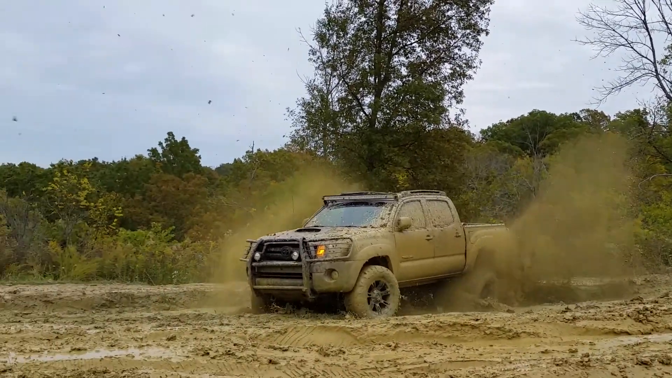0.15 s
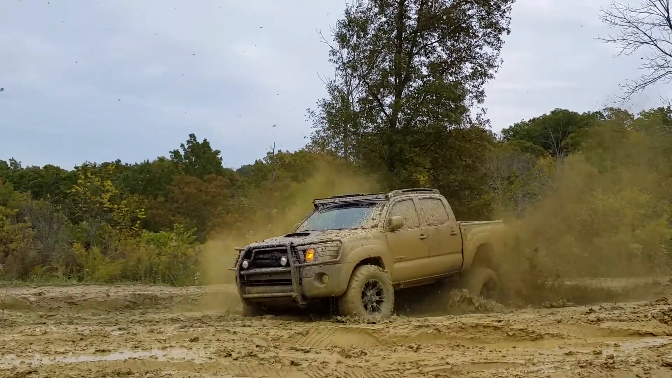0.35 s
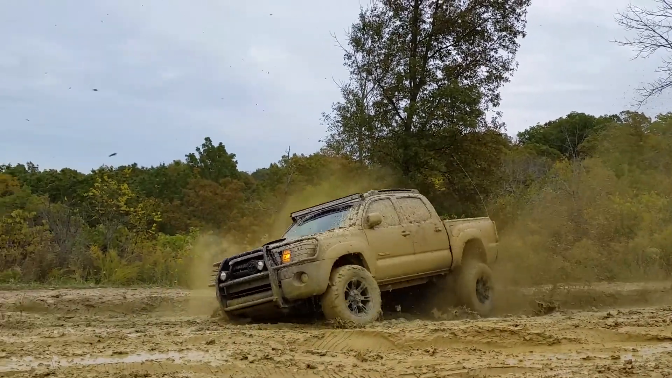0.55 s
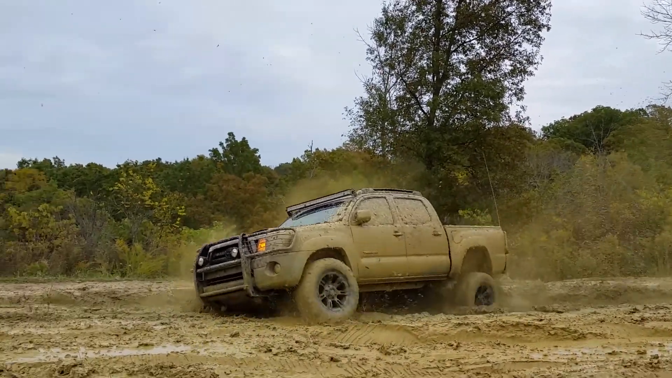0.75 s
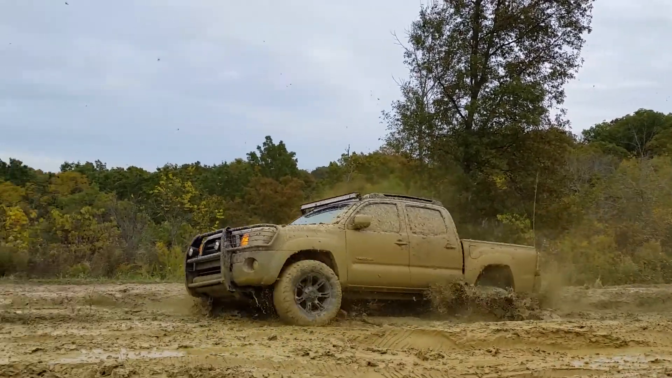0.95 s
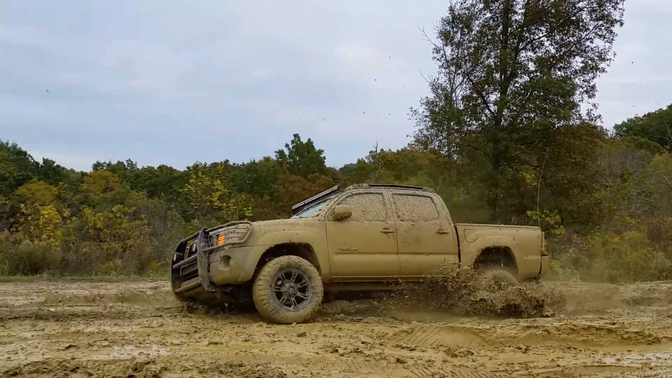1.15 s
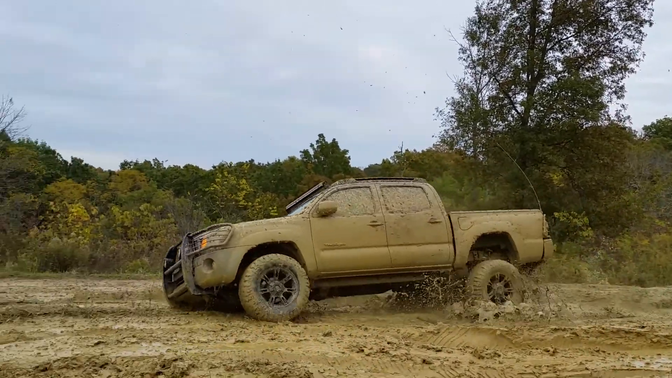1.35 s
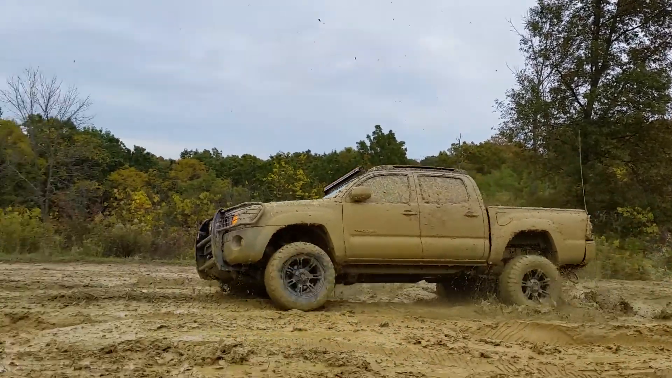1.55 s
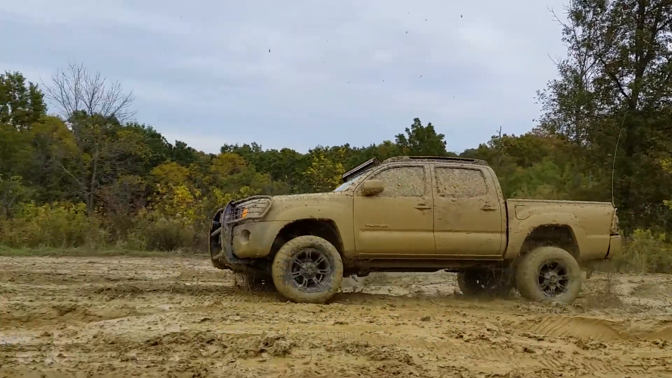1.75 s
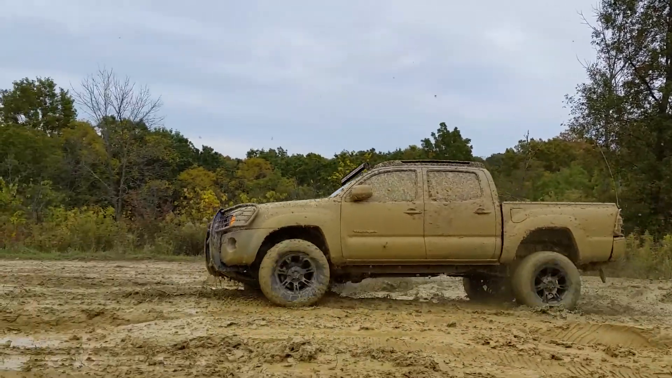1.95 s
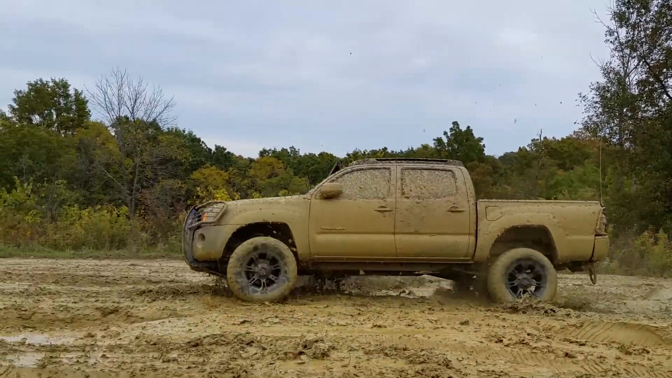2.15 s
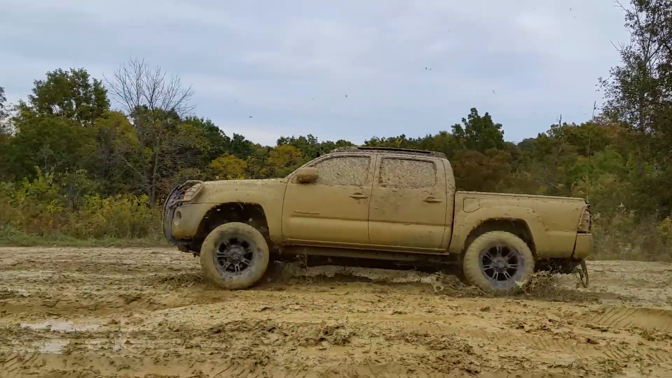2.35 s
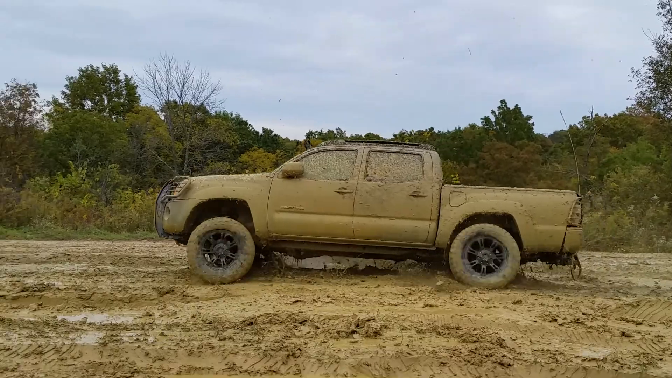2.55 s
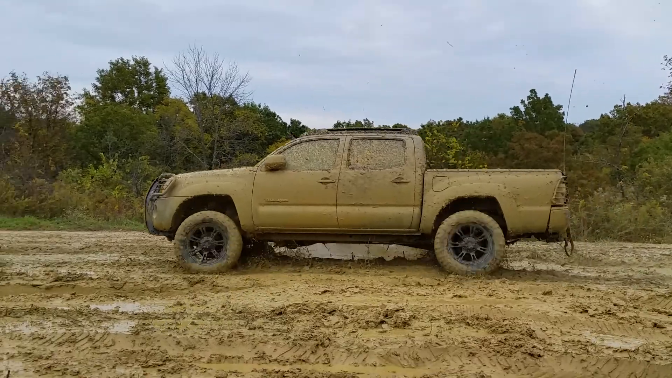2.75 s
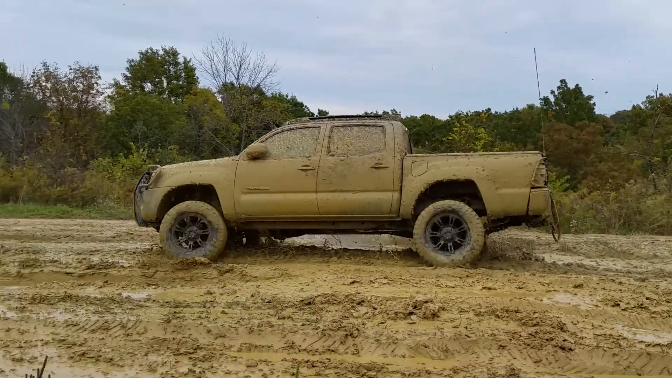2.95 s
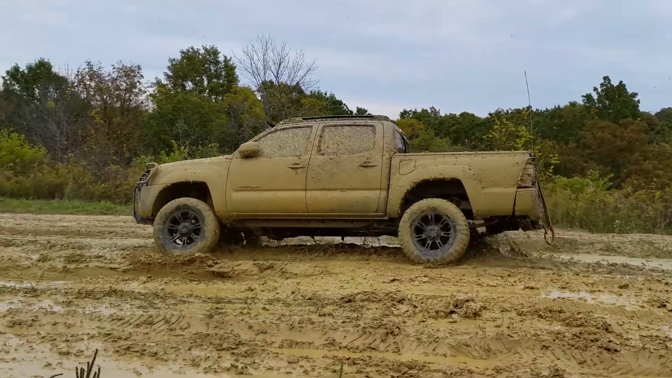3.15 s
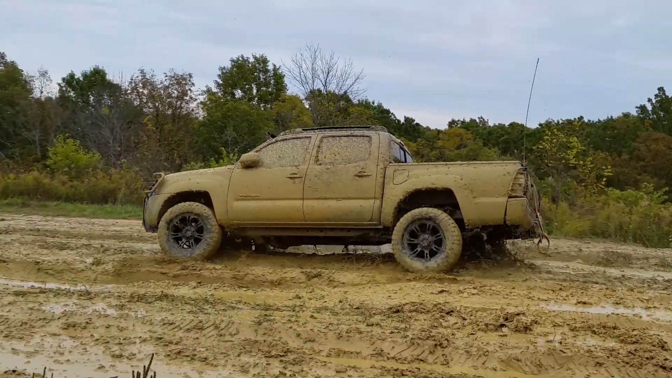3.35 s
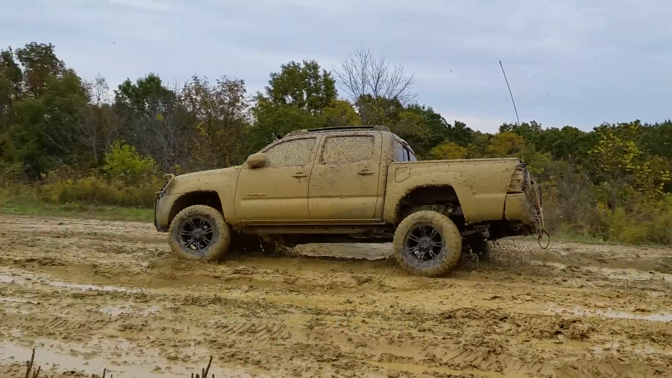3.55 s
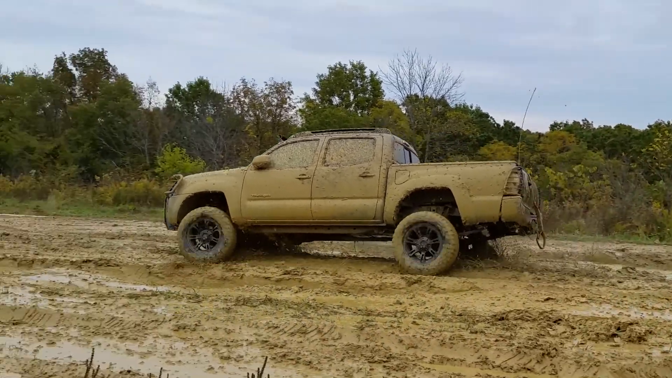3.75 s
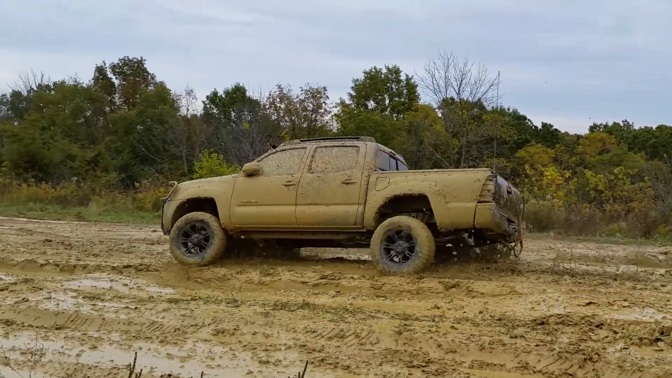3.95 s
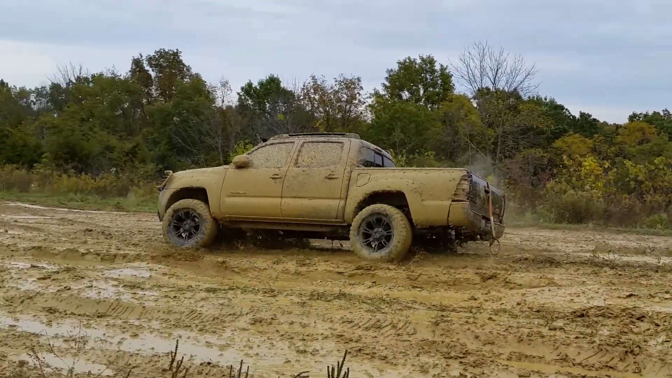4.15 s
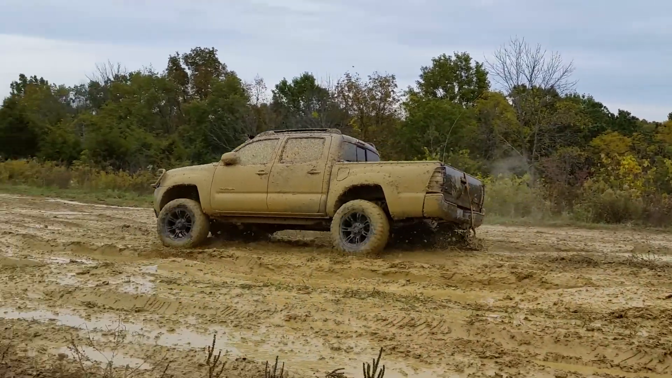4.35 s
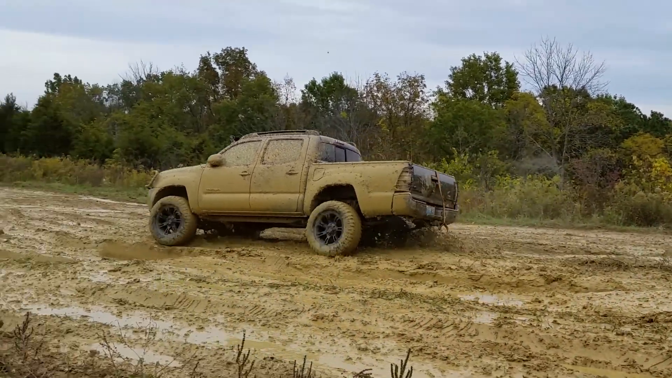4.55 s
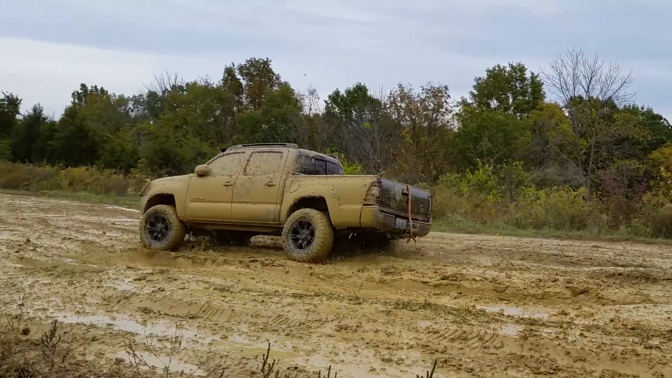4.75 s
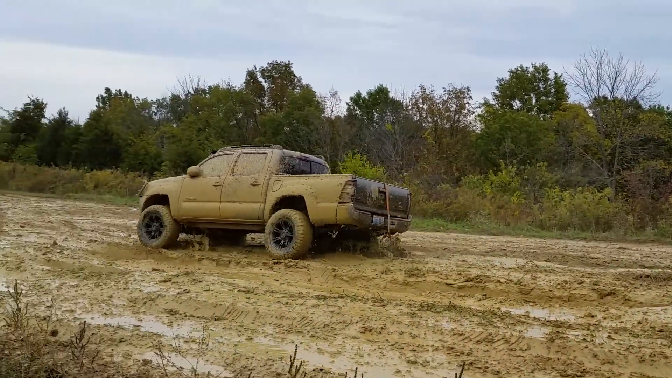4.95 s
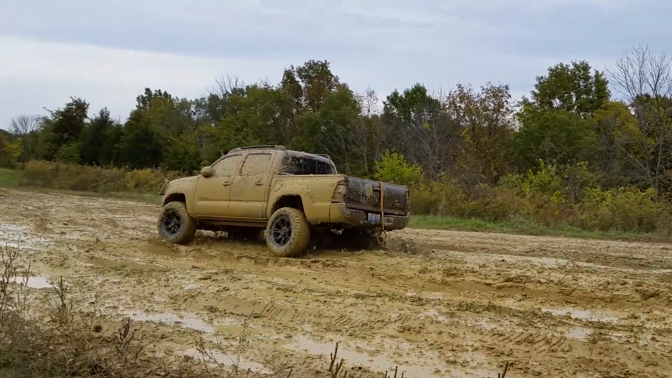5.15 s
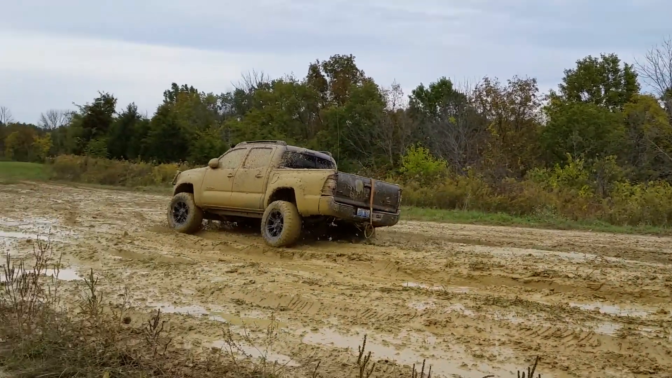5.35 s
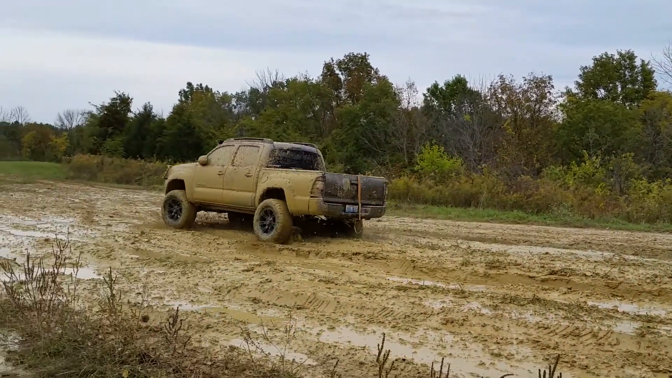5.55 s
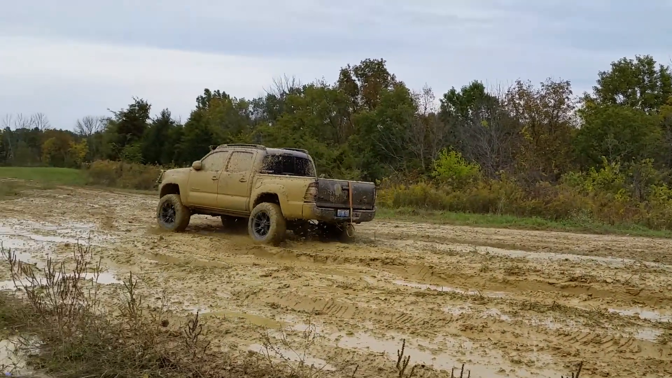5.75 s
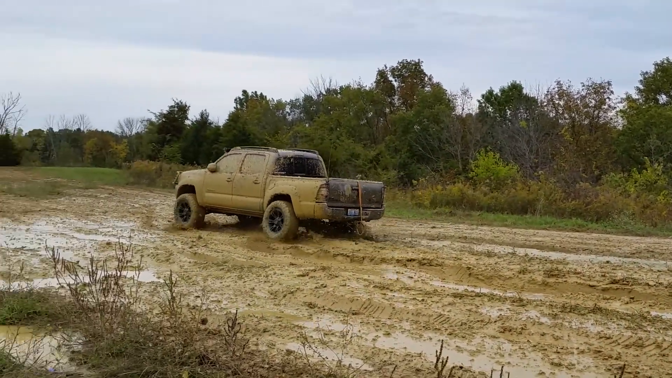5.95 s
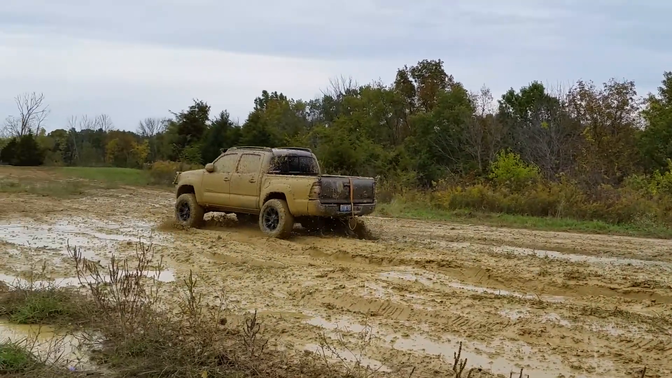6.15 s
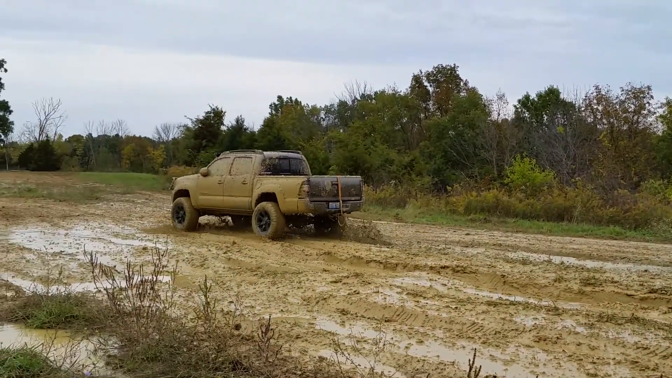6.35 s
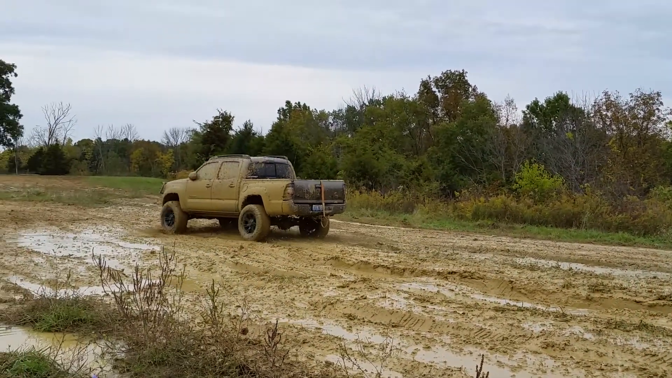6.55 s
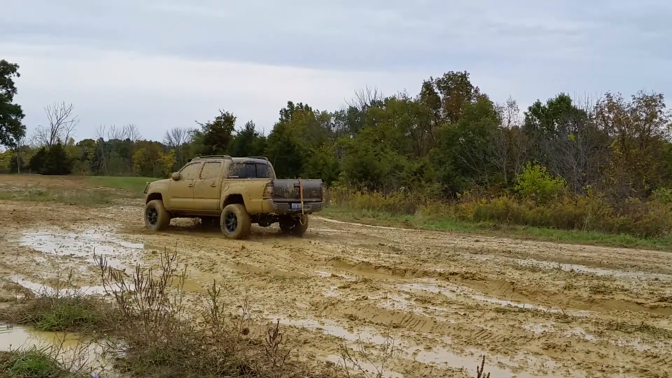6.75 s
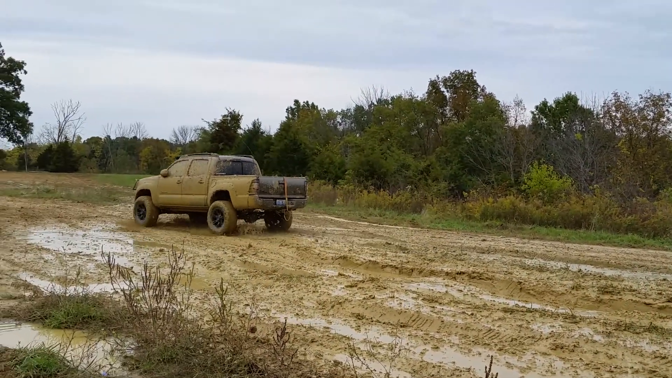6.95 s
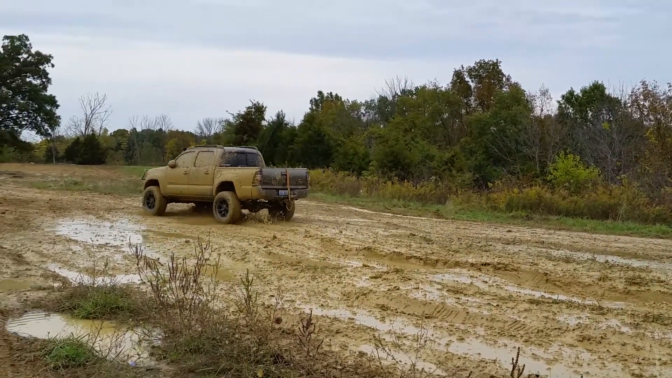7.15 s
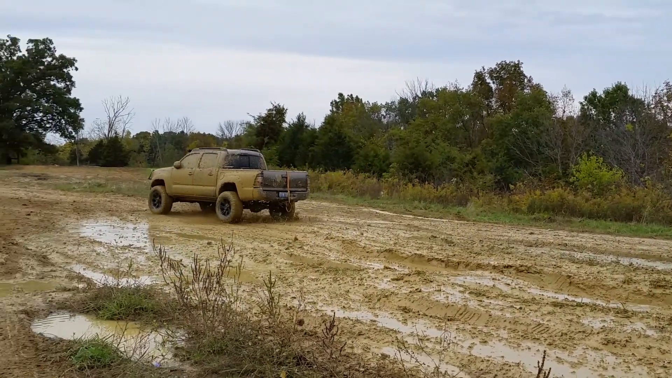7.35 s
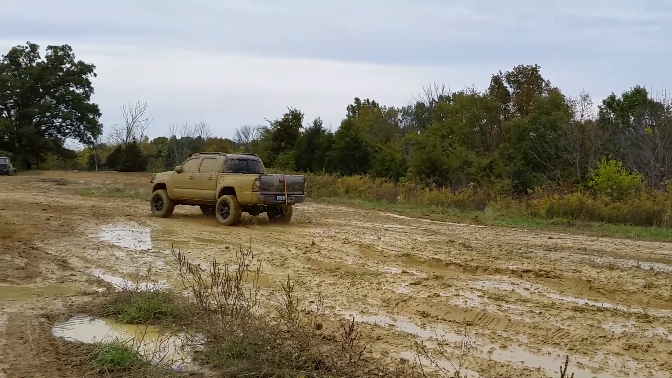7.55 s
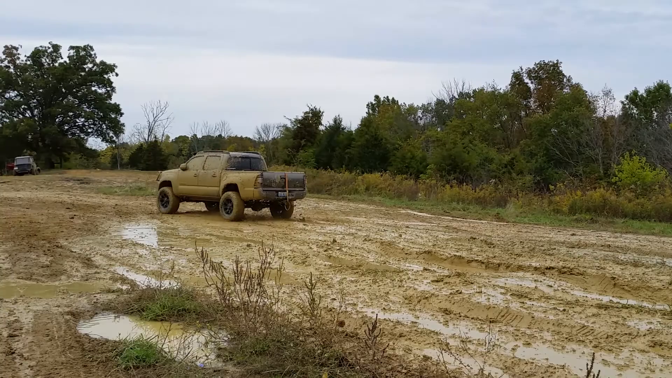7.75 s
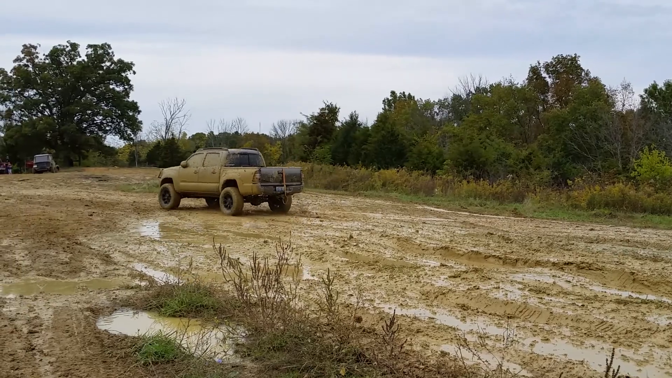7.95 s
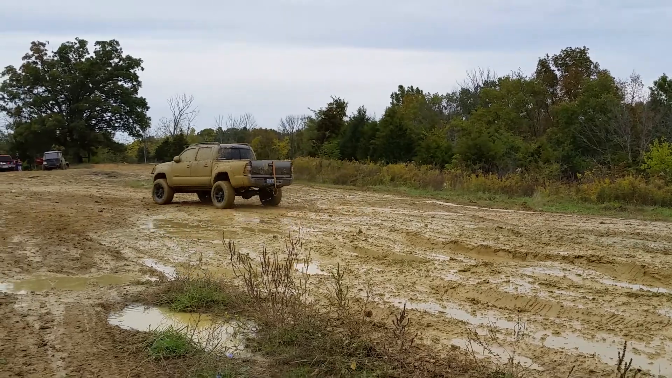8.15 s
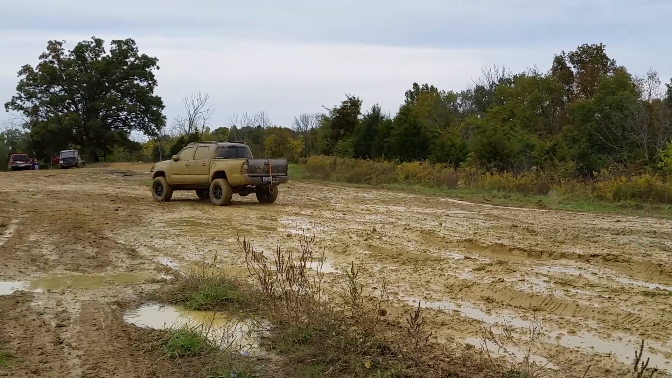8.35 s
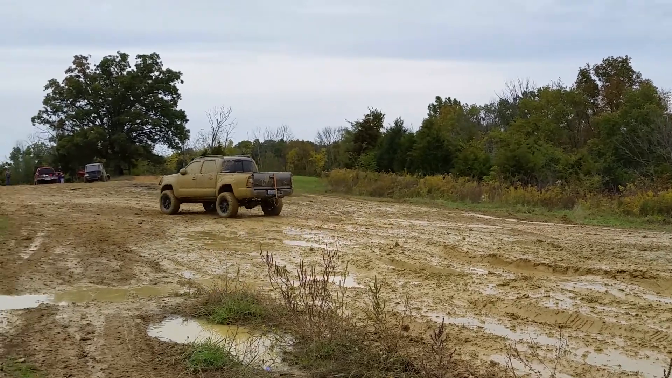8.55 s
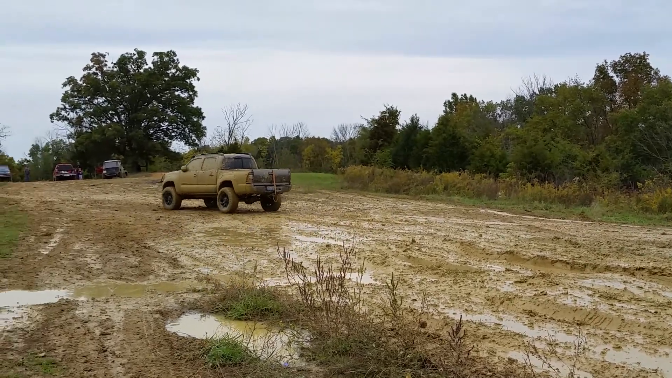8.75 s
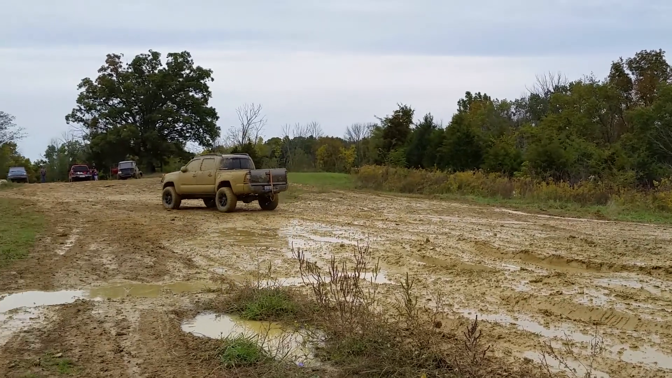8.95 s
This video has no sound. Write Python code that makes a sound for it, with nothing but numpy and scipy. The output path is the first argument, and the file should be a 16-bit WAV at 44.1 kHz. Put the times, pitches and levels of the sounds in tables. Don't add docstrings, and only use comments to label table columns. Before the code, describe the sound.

An open muddy field, heard close through a handheld stereo microphone. At 0 s a six-cylinder pickup is already revving hard, boomy and raspy, briefly climbing before sagging. Around 0.7-1.2 s it bogs low, with a coarse burble and the heaviest wet churn and splatter as it turns side-on. From 1.3 s revs climb to a strong droning peak near 2 s, then wobble in uneven surges until about 4.2 s, with softer splashes and dull clods knocking the wheel wells, notably near 2, 3.1 and 4.4 s. At 4.6 s the throttle lifts, the engine drops and burbles faintly. It pulls again from 5.1 s, deep and pulsing, peaking near 5.7 and 6.7 s as it draws away. Around 7.1 s it sags, gives a short push near 7.6 s, then sinks to a low grumble by 9 s over thinning, watery tyre hiss and small splashes.

```python
import sys
import numpy as np
from scipy import signal
from scipy.fft import rfft, irfft
from scipy.io import wavfile
from scipy.ndimage import uniform_filter1d, minimum_filter1d

SR = 44100
rng = np.random.default_rng(int(sys.argv[2]) if len(sys.argv) > 2 else 0)


def magnitude_from_level(level_db):
    exponent = np.asarray(level_db, float) / 20
    return 10 ** exponent


def dump_mix(stems):
    frames = np.atleast_2d(stems).T
    limited = np.clip(frames, -1, 1)
    pcm = np.round(limited * 32767).astype(np.int16)
    wavfile.write(sys.argv[1], SR, pcm)


N = 396900

# from_s, to_s
TURNS = [
    (.8, 1.11),
    (4.6, 5.39),
    (5.8, 6.9),
    (7.6, 7.5),
]
# time_s, level_db
SPRAY = [(0.0, -36.5), (0.7, -39), (0.77, -34.5), (0.95, -32.5), (1.08, -35.5), (1.5, -38), (1.75, -42.5),
         (2.68, -40.5), (2.93, -48), (3.16, -45.5), (4.41, -43.5), (4.69, -38), (5.04, -40.5), (6.57, -41),
         (6.89, -44.5), (6.99, -42), (8.85, -51), (9.0, -53)]
# share of the mud level, drawing_off_db, far_away_db, share of the splatters
MUD_LAYERS = [
    (.8, 3.5, 1, 1),
    (.9, 3.5, 3.5, .8),
    (.95, -0.5, 1, .3),
    (1.01, 1.9, -0.2, 0.32),
]
# time_s, half_length_s, level_db
SPLATTERS = [(0.887, 0.11, 3), (2.2, .2, 2.5), (5.303, 0.043, 0.5), (6.05, 0.13, 2.5), (6.4, .1, 0.5),
             (7.07, 0.1, 2), (7.35, 0.044, 0), (8.1, 0.16, 3), (8.55, 0.024, 3), (8.97, .03, 4.5)]
# frequency_hz, level_db
MUD_COLOUR = [(500, -1.5), (950, -4.5), (1250, 0.5), (1550, -4.5), (1850, 2), (2100, -6), (2500, -8)]
# frequency_hz, level_db
PORT_LEFT = [(1200, 0), (2600, 0.5), (2900, -11), (3200, -3), (4400, -2), (5000, -5.5), (5400, -20.5),
             (6000, -40), (6900, -13.5), (8300, -13), (9300, -1.5), (12000, 10.5), (13500, 3.5),
             (14400, -0.5)]
PORT_RIGHT = [(1200, 2.5), (2600, 0.5), (2880, -22), (3200, 1.5), (4300, 3), (5300, -1.5), (7200, -3),
              (7900, -11), (8400, -35), (9000, -9.5), (10200, 2.5), (12000, 0.5), (13200, 2.5),
              (14400, -8.5)]
# frequency_hz, likeness (0 to 1)
PORT_LIKENESS = [(400, 0.91), (900, 0.91), (1400, 0.51), (1900, 0.46), (2500, 0.34), (3500, 0.072),
                 (6000, 0.03)]
# pitch_hz, width_hz, level_db
LUMPS = [(640, 230, -2), (1185, 380, -1.9), (1793, 720, -1.5)]
# time_s, peak_db, pitch_hz, length_s
CLODS = [(0.39, -23, 350, .025), (1.985, -22, 640, .013), (2.041, -27, 620, .01), (3.099, -26, 520, .012),
         (3.904, -25, 1000, .016), (4.377, -20, 480, .014), (5.087, -25, 850, .02), (5.501, -32, 1007, .02),
         (5.654, -33, 598, .015), (7.068, -27, 600, .018)]
# time_s, half_length_s, level_db
BURBLES = [(0.852, 0.077, -22.5), (1.153, .08, -31), (4.602, 0.094, -32.5), (5.15, 0.097, -34.5),
           (7.12, .07, -36)]
# start_s, target_rate_hz (pairs of pulses), gas_db, tailpipe_bark_db
PEDAL = [(0.0, 46.5, 0.2, 1.8), (0.073, 53, 0.1, -1), (0.254, 40.4, -0.5, 0), (0.542, 31.8, 3.8, -5.5),
         (0.665, 18.0, -7, 6), (0.985, 28.8, -15.5, 1), (1.137, 24.4, 2.5, -0.5), (1.295, 36.3, -2, -1.9),
         (1.415, 54.1, -0.5, 1), (1.749, 58.8, -2, 1.9), (2.221, 45, -3, -2.5), (2.455, 42, -4, -8),
         (2.641, 45.6, -2.3, 6), (2.833, 33.8, -1, 2), (2.966, 52.4, -4.1, 2.3), (3.218, 32.2, -4.5, -4),
         (3.459, 45, -1.7, 1.5), (3.737, 46, -3.5, 1.7), (4.146, 38.4, -4, -0.3), (4.536, 21.5, -10, -0.5),
         (5.036, 29.5, 8, -0.5), (5.316, 44.6, 7, 3.0), (5.86, 34.1, 5, 3), (6.373, 43.5, 5, 2.5),
         (6.835, 28.2, 4.5, 3.8), (7.031, 22.3, -13, -1.8), (7.326, 18.7, -6.5, 0), (7.471, 33.8, 5, -1.5),
         (8.028, 24.3, -6.5, 4), (8.815, 21.7, -16, 2)]
# multiple, level_db, db per hz of speed, nose_db, tail_db
BOOM = [(2.0, -8, 0.1974, -11, -11.5), (4.0, -14, 0.0752, 4, -10), (3.0, -20.5, -0.13, -12.5, -11.5),
        (6.0, -22.5, 0.2, 3, -5.5)]
# frequency_hz, level_db
MUFFLER = [(40.0, -20.4), (52.0, -13), (64.0, -10), (78.0, 2.3), (110.0, 1.75), (165.0, 2), (200.0, -3.5),
           (350.0, -24.5)]
# time_s, half_length_s, level_db
DIPS_AND_LIFTS = [
    [(4.95, 0.099, -17), (9.8, .15, 0), (6.6, 0.081, 3.5), (6.4, 0.072, 4), (6.5, 0.12, -2.5),
     (7.2, .07, 3)],
    [(.95, .12, -4), (1.1, .035, -11), (1.75, 0.095, -11), (3.25, 0.11, 2.5), (5.8, 0.16, -8),
     (7.4, 0.066, -7), (7.62, .08, 2.5), (8.05, 0.0801, -2), (6.65, 0.12, -2)],
    [(2.05, 0.07, -3), (3.2, 0.12, 1.5)],
    [(3.21, 0.2, -7.5), (3.89, 0.36, -11.5), (0.55, .1, 7), (1.32, .1, 7.5), (5.9, 0.27, 4.5)],
]
# multiple, level_db, nose_db, tail_db
OVERTONES = [(5, -3, -2, 1.5), (7, 0.5, -5.5, -2.5), (8, 1, 4, 0.5), (9, -2, -1, -1.7), (10, -1, -1.5, 1.3),
             (11, -3.5, -4, .2), (12, -12, 7, 4), (13, -5, 2.5, 2.5), (14, -9.5, 2, 2), (15, -5, 4, .2),
             (16, -7.5, 4, -2)]
# frequency_hz, level_db
TAILPIPE = [(110, 2), (210, 4), (300, -4.5), (400, -20.5), (520, -12.5), (600, -4.5), (760, -48)]
# frequency_hz, level_db
ROAR = [(25, -25), (45, 1), (90, 14), (170, 14), (260, 4), (340, -2), (450, -37.5)]
# pitch_hz, width_hz, level_db
SHELL = [(465, 130, 1), (629, 92, 3.5)]
# level_db, share of gas, db per hz of speed, nose_db, tail_db
PIPE_LAW = (-35.5, .5, 0.1355, 4.5, -6)
RASP_LAW = (-42, 0.46, 0.305, 10.5, -5)
UNEVEN_LAW = (-34, 0, -.1, 1, 0)
# frequency_hz, density_db (per hz)
TREBLE_FLOOR = [(2300, -110), (2900, -99.5), (4500, -91), (5500, -92), (8500, -93.5), (9600, -100)]


def evened(x):
    return x / np.sqrt(np.mean(x ** 2) + 1e-20)


def read(points, hz):
    f, value = np.transpose(points)
    return np.interp(np.log(hz + 1), np.log(f + 1), value)


def bump(x, at, half):
    return np.exp(-((x - at) / half) ** 2)


def wander(hz):
    lowpass = signal.butter(2, hz, fs=SR, output="sos")
    return evened(signal.sosfilt(lowpass, rng.standard_normal(N)))


def resonate(x, hz, width):
    return signal.lfilter(*signal.iirpeak(hz, hz / width, fs=SR), x)


def clicks(per_s, spread_db):
    hits = rng.random(N) < per_s / SR
    signs = rng.choice([-1., 1.], N)
    sizes = magnitude_from_level(spread_db * np.minimum(rng.exponential(1, N), 3))
    return hits * signs * sizes


def mud_db(t):
    s, db = np.transpose(SPRAY)
    return np.interp(t, s, db)


def turns(t):
    return [np.interp(t, span, [0, 1]) for span in TURNS]


def mud_levels(t, hz):
    aside, tail, off, far = turns(t)
    splat_db = sum(db * bump(t, s, half) for s, half, db in SPLATTERS)
    layers = np.array(MUD_LAYERS) @ [mud_db(t), off, far, splat_db]
    layers -= layers.mean(1, keepdims=True)
    borders_hz = [2500, 3300, 4600, 5600, 8400, 9200]
    place = np.interp(np.log(hz + 1), np.log(borders_hz), [0, 1, 1, 2, 2, 3])
    share = np.maximum(1 - abs(place[:, None] - np.arange(4)), 0)
    behind_db = 9 * bump(hz, 2950, 160) - 7 * bump(hz, 12260, 900)
    return share @ layers + off * behind_db[:, None]


def mud():
    frames, hz = N // 128 + 5, np.fft.rfftfreq(512, 1 / SR)
    a, b, c, d, patches = rng.standard_normal((frames, 257, 5)).T
    patches = evened(uniform_filter1d(uniform_filter1d(patches, 8, 0), 18, 1))
    flicker = evened(uniform_filter1d(rng.standard_normal(frames), 12))
    level_db = mud_levels(np.arange(frames) * 128 / SR, hz)
    level_db = level_db + 0.75 * patches + 0.63 * flicker
    same = np.clip(read(PORT_LIKENESS, hz), 0, 1)[:, None]
    left = a + 1j * b
    right = same * left + np.sqrt(1 - same ** 2) * (c + 1j * d)
    ports_db = np.array([read(PORT_LEFT, hz), read(PORT_RIGHT, hz)])
    colour_db = ports_db + read(MUD_COLOUR, hz) - 80 * (hz < 300)
    z = np.array([left, right]) * magnitude_from_level(colour_db)[..., None] * magnitude_from_level(level_db)
    out = signal.istft(z, nperseg=512, noverlap=384)[1][:, :N]
    return magnitude_from_level(-33.5) * evened(out)


def drops():
    t = np.arange(N) / SR
    lumps = np.zeros(N)
    for hz, width, db in LUMPS:
        hits = clicks(per_s=60, spread_db=4.5)
        lumps += magnitude_from_level(db) * evened(resonate(resonate(hits, hz, width), hz, width))
    off = turns(t)[2]
    return lumps * magnitude_from_level(-10 + .8 * (mud_db(t) + 39) - 39 + 6.4 * off)


def clods():
    out = np.zeros((2, N))
    t = np.arange(4000) / SR
    attack = np.minimum(t / .0015, 1)
    for s, db, hz, length in CLODS:
        grit = rng.standard_normal(4000)
        thud = resonate(resonate(resonate(grit, hz, hz), hz, hz), hz, 2 * hz)
        burst = evened(thud) * np.exp(-t / length) * attack
        out[:, round(s * SR):][:, :4000] += magnitude_from_level(db - 5) * burst
    return out


def burble():
    t = np.arange(N) / SR
    pipe_hz, width_hz = 216, 134
    pops = clicks(per_s=90, spread_db=2.5)
    pops = resonate(resonate(pops, pipe_hz, width_hz), pipe_hz, width_hz)
    return evened(pops) * sum(magnitude_from_level(db) * bump(t, s, half) for s, half, db in BURBLES)


def follow(column, lag_s, t):
    rows = np.array(PEDAL)
    u = np.maximum(t[:, None] - rows[1:, 0], 0) / lag_s
    return rows[0, column] + (1 - (1 + u) * np.exp(-u)) @ np.diff(rows[:, column])


def controls():
    t = np.arange(0, N / SR + .01, .005)
    flywheel_s, gas_s = .116, .068
    hz = follow(column=1, lag_s=flywheel_s, t=t)
    gas_db = follow(column=2, lag_s=gas_s, t=t)
    bark_db = follow(column=3, lag_s=gas_s, t=t)
    aside, tail, off, far = turns(t)

    def law(db, share, per_hz, nose_db, tail_db):
        facing_db = nose_db * (1 - aside) + tail_db * tail
        return db + share * gas_db + per_hz * (hz - 40) + facing_db

    pipe_db = law(*PIPE_LAW) + bark_db
    rasp_db = law(*RASP_LAW) + 1.5 * bark_db
    order_db = []
    for (k, db, *rest), changes in zip(BOOM, DIPS_AND_LIFTS):
        change_db = sum(d * bump(t, s, half) for s, half, d in changes)
        order_db.append(law(db, 1, *rest) + read(MUFFLER, k * hz) + change_db)
    columns = (hz, pipe_db, rasp_db, law(*UNEVEN_LAW), *order_db)
    return [np.interp(np.arange(N) / SR, t, c) for c in columns]


def multiple(k, turn):
    return np.sqrt(2) * np.cos(k * turn - 0.4414 * k ** 2 / 4)


def rasp(turn, rasp_db):
    since_firing = turn / np.pi % 1
    puffs = (0.83 + np.exp(-since_firing / .3)) * magnitude_from_level(3.3 * wander(30)) * rng.standard_normal((2, N))
    puffs[1] = 0.98 * puffs[0] + 0.33 * puffs[1]
    shell = sum(magnitude_from_level(db) * resonate(resonate(puffs, c, w), c, 1.25 * w) for c, w, db in SHELL)
    return magnitude_from_level(rasp_db - 2.5) * evened(shell)


def roar(load):
    gusts = rng.standard_normal((2, N))
    gusts[1] = 1.02 * gusts[0] + 0.2 * gusts[1]
    colour = magnitude_from_level(read(ROAR, np.fft.rfftfreq(N, 1 / SR)))
    return magnitude_from_level(-29) * (load ** 0.36 + 0.056) * evened(irfft(rfft(gusts) * colour, N))


def overtones(turn, hz, pipe_db, order_db, load):
    imbalance_db = uniform_filter1d(order_db[2] - 20 * np.log10(load), 9000) + 11
    odd_db = 0.26 * imbalance_db + 0.37 * (hz - 42)
    aside, tail, off, far = turns(np.arange(N) / SR)
    out = np.zeros(N)
    for k, db, nose_db, tail_db in OVERTONES:
        facing_db = nose_db * (1 - aside) + tail_db * tail
        level_db = pipe_db + db + facing_db + read(TAILPIPE, k * hz) + k % 2 * odd_db
        out += magnitude_from_level(level_db + 3 * wander(11)) * multiple(k, turn)
    beat_db = order_db[0] - 33 + 0.86 * (hz - 45.5)
    return out + magnitude_from_level(beat_db) * multiple(0.97, turn)


def boom(turn, order_db, uneven_db):
    out = np.zeros(N)
    for (k, *_), db in zip(BOOM, order_db):
        out += magnitude_from_level(db + .5 * wander(18)) * multiple(k, turn)
    shake = np.cos(turn * 2 / 3) + 0.28 * np.cos(turn / 3)
    return out * (1 + 2 * magnitude_from_level(uneven_db) * shake)


def exhaust():
    hz, pipe_db, rasp_db, uneven_db, *order_db = controls()
    turn = 2 * np.pi * np.cumsum(hz * (1 + 0.003 * wander(25))) / SR
    load = np.sqrt(sum(magnitude_from_level(db) ** 2 for db in order_db))
    pipe = boom(turn, order_db, uneven_db) + overtones(turn, hz, pipe_db, order_db, load) + roar(load)
    ports = magnitude_from_level(np.array([[-.27], [.27]]))
    return pipe * ports + rasp(turn, rasp_db)


def scene():
    return mud() + drops() + clods() + burble() + exhaust()


def top_cut(x):
    return signal.sosfilt(signal.butter(12, 14580, fs=SR, output="sos"), x)


def record(dry):
    room = np.minimum(.9 / (abs(dry).max(0) + 1e-9), 1)
    gain = uniform_filter1d(minimum_filter1d(room, size=1300), size=1300)
    frame = dict(fs=SR, window="cosine", nperseg=2048, noverlap=1024, scaling="psd")
    hz, t, z = signal.stft(dry * gain, **frame)
    nearby = np.sqrt(uniform_filter1d(abs(z) ** 2, size=5, axis=1))
    in_band = (hz > TREBLE_FLOOR[0][0]) & (hz < TREBLE_FLOOR[-1][0])
    shut = (nearby < magnitude_from_level(read(TREBLE_FLOOR, hz))[:, None]) & in_band[:, None]
    mix = signal.istft(z * ~shut, **frame)[1][:, :N]
    return top_cut(mix)


dry = scene()
out = record(dry)
dump_mix(out)
```